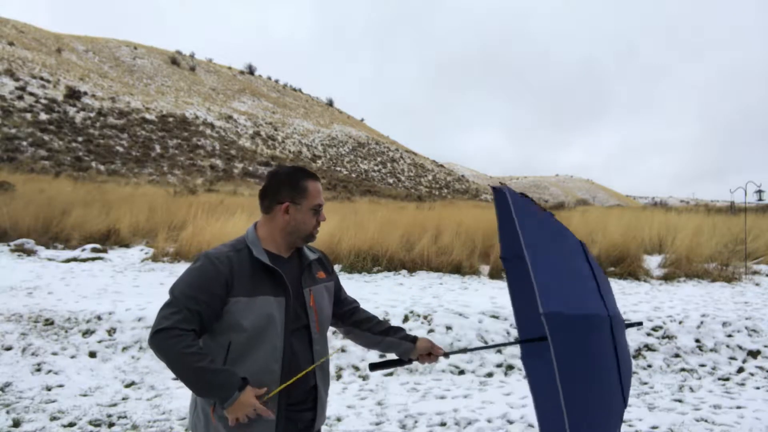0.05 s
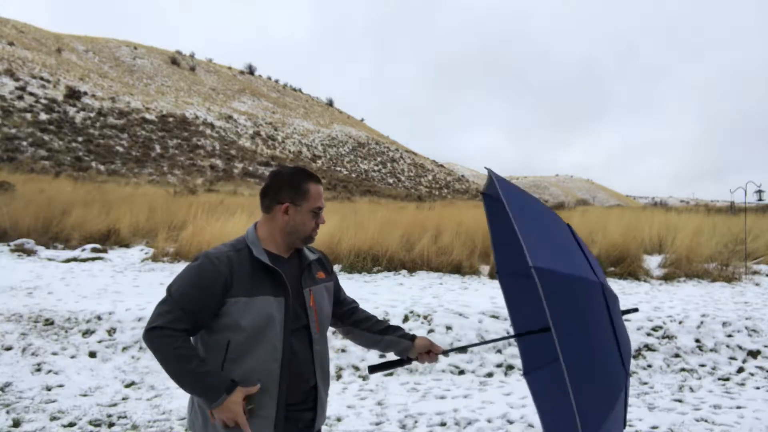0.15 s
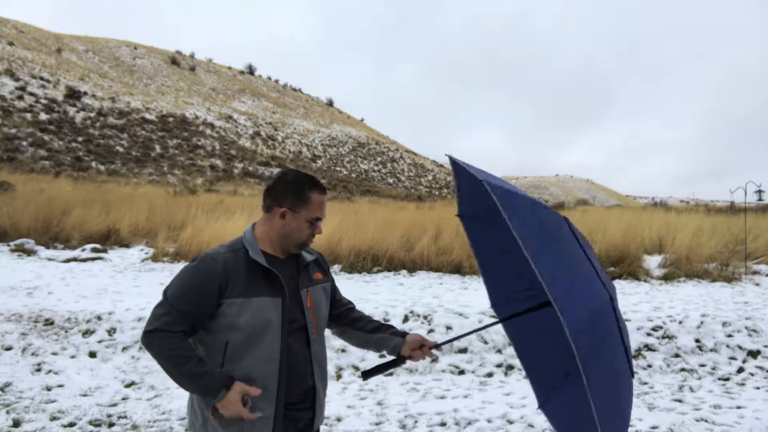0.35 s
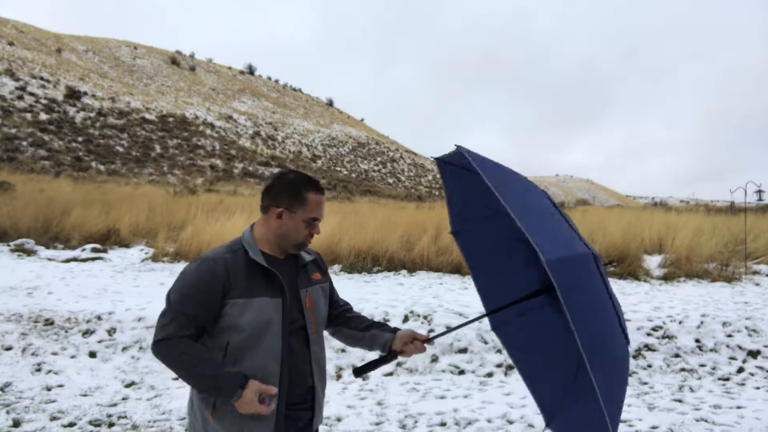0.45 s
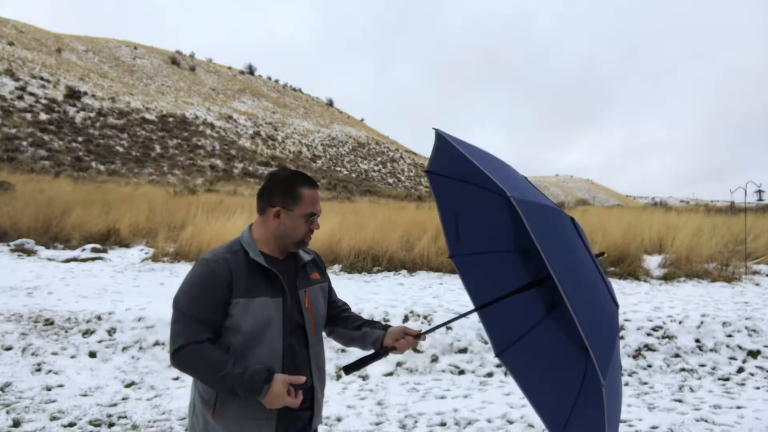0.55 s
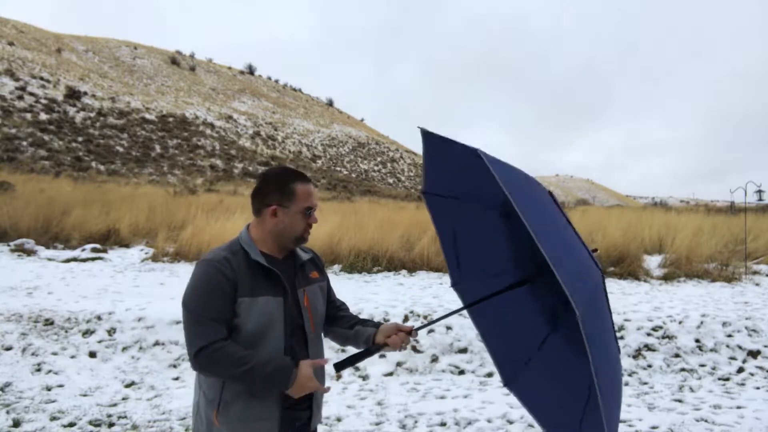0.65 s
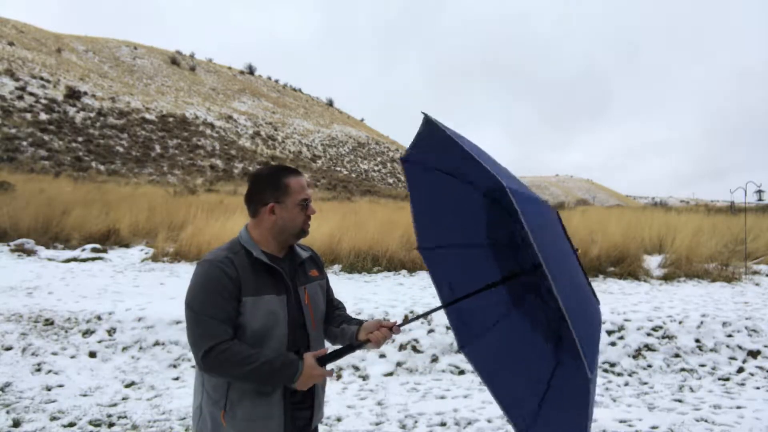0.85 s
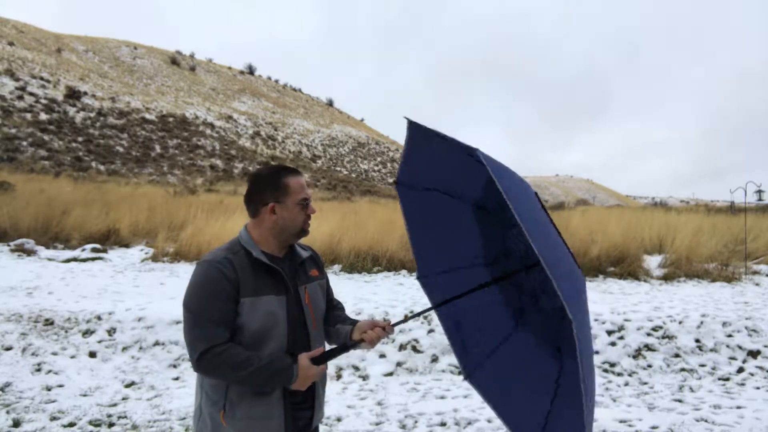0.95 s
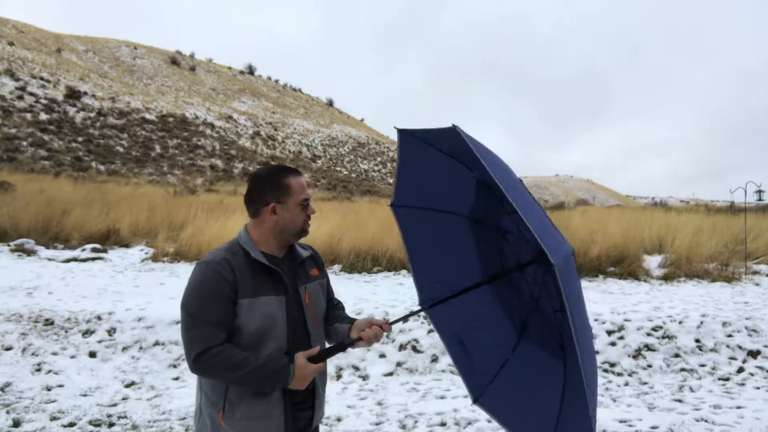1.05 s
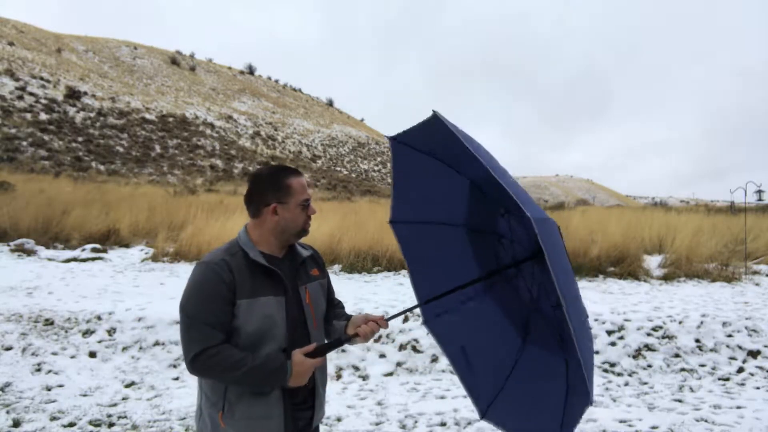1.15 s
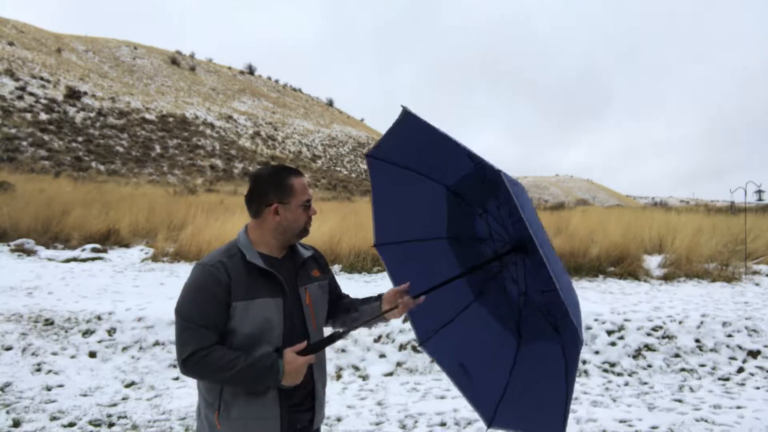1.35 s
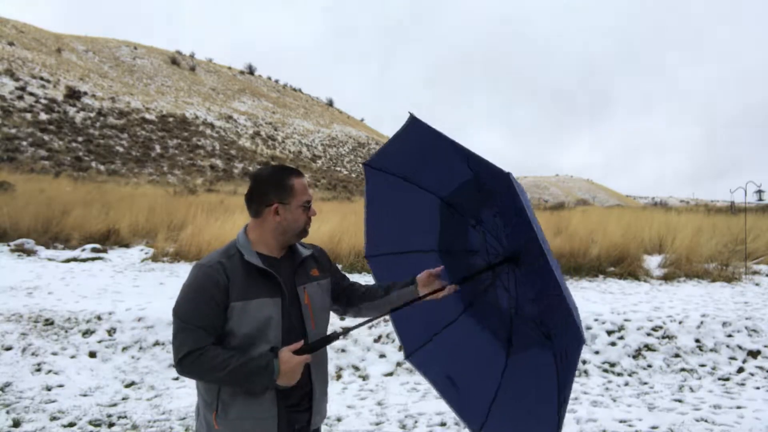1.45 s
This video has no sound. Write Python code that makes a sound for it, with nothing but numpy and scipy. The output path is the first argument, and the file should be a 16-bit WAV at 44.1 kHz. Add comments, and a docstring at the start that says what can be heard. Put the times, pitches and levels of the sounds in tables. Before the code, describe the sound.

An umbrella opens with a short cloth rustle and one sharp locking snap.

```python
"""Opening an umbrella outdoors

The canopy rustles taut as the runner slides up, the steel catch clicks and the runner snaps home,
exciting the modes of frame and cloth. The ribs rattle briefly; then come a soft bump, the friction
of a sleeve and a hand closing on the handle, over faint open air."""
import sys
import numpy as np
from scipy import signal
from scipy.fft import rfft, irfft
from scipy.io import wavfile
from scipy.ndimage import uniform_filter1d

SR = 44100
rng = np.random.default_rng(int(sys.argv[2]) if len(sys.argv) > 2 else 0)


def master(y):
    """Save y as 16-bit WAV."""
    cut = np.clip(np.atleast_2d(y).T, -1, 1)
    pcm = np.round(cut * 32767)  # scale
    wavfile.write(sys.argv[1], SR, pcm.astype(np.int16))


N = 66150
T = np.arange(N) / SR


def amp(db):
    """Decibels to amplitude."""
    return 10 ** (np.asarray(db) / 20)


def unit(x):
    """Normalisation to rms 1."""
    return x / np.sqrt(np.mean(x ** 2) + 1e-20)


def colour(x, spectrum):
    """Spectral shaping, at rms 1."""
    hz, db = np.transpose(spectrum)
    bins_hz = np.fft.rfftfreq(N, 1 / SR)
    gain = amp(np.interp(np.log(bins_hz + 1), np.log(hz + 1), db))
    return unit(irfft(rfft(x) * gain, N))


def noise(spectrum):
    """Filtered Gaussian noise."""
    return colour(rng.standard_normal(N), spectrum)


def level(curve):
    """An envelope interpolated in decibels."""
    return amp(np.interp(T, *np.transpose(curve)))


def strike(start, rise, t60):
    """Linear attack and exponential decay."""
    age = np.maximum(T - start, 0)
    return np.minimum(age / rise, 1) * np.exp(-np.log(1000) * age / t60)


def ring(start, modes, rise):
    """Free vibration as a sum of damped modes."""
    return sum(amp(db) * strike(start, rise, t60) * np.sin(2 * np.pi * hz * (T - start))
               for hz, db, t60 in modes)


def swell(start, length, db):
    """A half-sine envelope."""
    return amp(db) * np.sin(np.pi * np.clip((T - start) / length, 0, 1))


def strokes(rows, spectrum):
    """Noise modulated by one swell per row."""
    return noise(spectrum) * sum(swell(*row) for row in rows)


def friction_tone(start, length, db, hz, sag_hz_per_s, jitter):
    """A wavering friction tone whose pitch falls as sliding slows."""
    waver = unit(uniform_filter1d(rng.standard_normal(N), size=90))
    pitch = (hz - sag_hz_per_s * np.clip(T - start, 0, length)) * (1 + jitter * waver)
    return swell(start, length, db) * unit(np.sin(2 * np.pi * np.cumsum(pitch) / SR))


# Spectra of air and buffets. Each row: frequency in Hz, relative level in dB.
AIR_SPECTRUM = [(15, -30), (45, -1), (90, -2.5), (230, -5), (350, -9), (1200, -13), (15500, -31)]
BUFFET_SPECTRUM = [(25, -22), (80, 1.5), (130, -5.5), (1000, -72)]
# Each row: start in seconds, length in seconds, level in dB.
AIR_BUFFETS = [(.432, .032, -58), (.603, .05, -61)]


def open_air():
    """Moving air makes faint broadband noise with soft low buffets."""
    return amp(-67) * noise(AIR_SPECTRUM) + strokes(AIR_BUFFETS, BUFFET_SPECTRUM)


# Spectra of the cloth's motions. Each row: frequency in Hz, relative level in dB.
CREASE_SPECTRUM = [(150, -20), (450, -7.5), (800, -9.5), (1250, 0), (2800, -6), (3400, -1.5), (5000, -6),
                   (6500, -1.5), (7600, -8), (10300, -14), (11500, -10), (15500, -14)]
FLAP_SPECTRUM = [(120, -22), (350, -2), (560, 0), (800, -9), (1250, -2.5), (3500, -12), (8000, -30.5)]
DRAG_SPECTRUM = [(800, -39), (2200, -18), (3200, 1), (4500, -6.5), (6300, -7), (9000, -19), (16000, -27)]
# Each row: time in seconds, level in dB.
RUSTLE_ENVELOPE = [(0, -50.5), (.035, -50.5), (.056, -53), (.07, -49.5), (.095, -45), (.113, -45.5),
                   (.137, -47.5), (.16, -41.5), (.198, -47), (.222, -40.5), (.26, -43), (.29, -58.5),
                   (.45, -75.5)]
# Each row: start in seconds, length in seconds, level in dB.
PANEL_FLAPS = [(0, .02, -44.5), (.075, .027, -46.5), (.143, .012, -43), (0.25, 0.023, -43)]
CLOTH_DRAGS = [(.047, 0.018, -47.5), (.086, 0.016, -44.5), (.15, 0.019, -41.5)]


def canopy_rustle(creases_per_s=2500, spread_db=2.5, crease_share=0.37):
    """Tension releases creases as random impulses, while panels flap out and drag over the ribs."""
    sizes = amp(spread_db * np.minimum(rng.exponential(1, N), 4))
    creases = unit(sizes * rng.choice([-1, 1], N) * (rng.random(N) < creases_per_s / SR))
    crackle = np.sqrt(crease_share) * creases + np.sqrt(1 - crease_share) * rng.standard_normal(N)
    rustle = colour(crackle, CREASE_SPECTRUM) * level(RUSTLE_ENVELOPE)
    return rustle + strokes(PANEL_FLAPS, FLAP_SPECTRUM) + strokes(CLOTH_DRAGS, DRAG_SPECTRUM)


# Each row: frequency in Hz, relative level in dB.
GLIDE_SPECTRUM = [(6000, -25), (8000, -2.5), (10200, -6), (11700, 0), (15500, 0)]
# Each row: time in seconds, level in dB.
GLIDE_ENVELOPE = [(0, -51), (.07, -59), (.23, -59.5), (.26, -91)]
# Each row: start in seconds, length in seconds, level in dB, pitch in Hz.
RUNNER_SQUEAKS = [(.208, .014, -38.5, 1710), (.22, .014, -42.5, 1690)]


def runner_glide():
    """Sliding friction on the shaft hisses, then squeaks just before the runner locks."""
    squeaks = sum(friction_tone(*row, sag_hz_per_s=1500, jitter=0.015) for row in RUNNER_SQUEAKS)
    return squeaks + noise(GLIDE_SPECTRUM) * level(GLIDE_ENVELOPE)


# Spectra of the jacket's friction. Each row: frequency in Hz, relative level in dB.
SLEEVE_SPECTRUM = [(60, -19.5), (150, -7), (1050, -4), (4200, -10.5), (15500, -21.5)]
CUFF_SPECTRUM = [(200, -24), (1100, -9), (1600, 6), (2000, -3), (9000, -32)]
# Each row: time in seconds, level in dB.
SLEEVE_ENVELOPE = [(.3, -64.5), (.44, -58.5), (.58, -60.5), (.65, -60.5), (.73, -63), (.79, -77.5),
                   (.96, -72), (1.01, -63.5), (1.04, -64.5), (1.08, -80), (1.5, -69.5)]
# Each row: start in seconds, length in seconds, level in dB.
CUFF_BRUSHES = [(.615, 0.059, -59)]
# Each row: start in seconds, length in seconds, level in dB, pitch in Hz.
WEAVE_TONES = [(0.633, 0.045, -58, 1450), (.668, .046, -66, 640)]


def sleeve_rub():
    """Cloth friction makes a soft noise; the weave sings faintly as the cuff brushes the jacket."""
    weave = sum(friction_tone(*row, sag_hz_per_s=3000, jitter=0.028) for row in WEAVE_TONES)
    rub = noise(SLEEVE_SPECTRUM) * level(SLEEVE_ENVELOPE)
    return weave + rub + strokes(CUFF_BRUSHES, CUFF_SPECTRUM)


# Each row: frequency in Hz, relative level in dB, 60 dB decay time in seconds.
FRAME_MODES = [(856, -19.6, .01), (1320, -8.5, .02), (1595, -2.2, .023), (1755, -16, .024),
               (2066, -9.8, .018), (2280, -3.6, .009), (2690, -13, .013), (3010, -22, .024),
               (3560, -13.5, 0.019), (3770, -23, .033)]
CANOPY_MODES = [(262, -4.2, .022), (380, -5.6, .04), (516, 3, .019), (611, 5.6, .015)]
# Each row: start in seconds, frame gain in dB, canopy gain in dB.
FRAME_BLOWS = [(.019, -34, -64), (.2398, -19.5, -45), (.2472, -7.2, -41), (.24954, -.3, -21.7),
               (.2535, -19.3, -44), (0.2627, -19, -41), (.2735, -31, -52), (0.305, -32, -62),
               (.325, -37, -69), (.3296, -36, -75), (.347, -40, -68)]


def frame_knocks(rise_s=0.00058):
    """Impacts of the runner and rattling ribs excite the modes of the frame and taut canopy."""
    return sum(amp(frame_db) * ring(start, FRAME_MODES, rise_s)
               + amp(canopy_db) * ring(start, CANOPY_MODES, rise_s)
               for start, frame_db, canopy_db in FRAME_BLOWS)


# Each row: frequency in Hz, relative level in dB.
SHIVER_SPECTRUM = [(150, -24.5), (300, -6), (600, -6.5), (790, -16), (1200, -5), (6000, -1), (16000, -11)]


def shiver(snap, split_hz=3000, rise_s=0.00058):
    """Vibration diffuses through ribs and cloth, where damping takes the treble first."""
    diffuse = noise(SHIVER_SPECTRUM)
    low = signal.sosfilt(signal.butter(2, split_hz, fs=SR, output="sos"), diffuse)
    high = signal.sosfilt(signal.butter(2, split_hz, "high", fs=SR, output="sos"), diffuse)
    tail = low * strike(0, rise_s, t60=0.17) - high * strike(0, rise_s, t60=0.11)
    return amp(-23) * signal.fftconvolve(snap, tail / np.linalg.norm(tail))[:N]


# Each row: frequency in Hz, relative level in dB.
CATCH_MODES = [(4660, -6), (5240, -3), (5420, -4), (5800, -1.5), (6270, -.5), (6560, -3), (6900, -7),
               (9560, -7)]
CRACK_SPECTRUM = [(700, -32), (1800, -10), (3400, -5), (4300, -7), (5200, 0), (6600, .5), (7300, -12),
                  (7900, -7), (9500, -6), (10200, -12), (16000, -15)]
# Each row: start in seconds, crack and ring gains in dB, 60 dB decay in seconds, tilt in dB per octave.
CATCH_CLICKS = [(0.12, -38, -54, .035, 1.5), (.154, -39, -55, .03, -1.5), (0.2166, -29.5, -44.5, 0.026, 4),
                (.2398, -19.5, -31, .022, 2), (.2471, -7, -9, 0.0088, -0.5), (0.2494, -19, -32, 0.025, 0),
                (0.2737, -39.5, -45.5, .02, -1), (0.3041, -33, -42, .022, -2.5)]


def catch_clicks(rise_s=0.00084):
    """Hard steel contact at the catch and rib joints gives a broadband crack and a short modal ring."""
    clicks = np.zeros(N)
    for start, crack_db, ring_db, t60, tilt in CATCH_CLICKS:
        crack = noise([(hz, db + tilt * np.log2(hz)) for hz, db in CRACK_SPECTRUM])
        modes = [(hz, db, t60) for hz, db in CATCH_MODES]
        clicks += amp(crack_db) * crack * strike(start, rise_s, t60)
        clicks += amp(ring_db) * ring(start, modes, rise_s)
    return clicks


# Each row: frequency in Hz, relative level in dB.
SCRAPE_SPECTRUM = [(400, -20), (1200, -4.5), (1750, 2.5), (2500, -10), (3300, -4), (4800, -12), (5900, -7),
                   (13000, -29)]
# Each row: start in seconds, length in seconds, level in dB.
RIB_SLIDES = [(.272, .016, -50), (.291, .011, -47.5), (.305, .017, -45), (.322, .046, -54),
              (.37, .02, -55.5)]


def rib_scrape():
    """Sliding friction makes bursts of noise as the ribs settle."""
    return strokes(RIB_SLIDES, SCRAPE_SPECTRUM)


# Each row: frequency in Hz, relative level in dB.
PAT_SPECTRUM = [(30, -17), (120, -6), (300, -2), (550, 0), (850, -7), (1400, -7.5), (2400, -15),
                (15000, -31)]
# Each row: start in seconds, level in dB, 60 dB decay time in seconds, thud level in dB.
HAND_PATS = [(.427, -40, .039, -54), (.764, -55, .029, -76), (.981, -47.5, .028, -64)]
# Each row: frequency in Hz, relative level in dB, 60 dB decay time in seconds.
HANDLE_MODES = [(323, -6, .04), (524, -1, .026), (835, 1, .04), (1290, 1, 0.047), (1560, -2.5, .028),
                (2740, -4, .02), (3530, -4, .025)]
PALM_MODES = [(286, -12, 0.033), (490, 1, 0.016), (770, -7, 0.011)]
# Each row: start in seconds, handle gain in dB, palm gain in dB.
HAND_GRIPS = [(.978, -52.5, -62.5), (0.9815, -50.5, -49.5), (0.9976, -63, -50)]


def hand_contacts(rise_s=0.00081, thud_hz=73, thud_t60_s=0.13):
    """Soft impacts give dull pats and thuds; the grip excites modes of the hollow handle and the palm."""
    skin = noise(PAT_SPECTRUM)
    contacts = np.zeros(N)
    for start, db, t60, thud_db in HAND_PATS:
        contacts += amp(db) * skin * strike(start, rise_s, t60)
        contacts += ring(start, [(thud_hz, thud_db, thud_t60_s)], rise_s)
    for start, handle_db, palm_db in HAND_GRIPS:
        contacts += amp(handle_db) * ring(start, HANDLE_MODES, rise_s)
        contacts += amp(palm_db) * ring(start, PALM_MODES, rise_s)
    return contacts


# Each row: frequency in Hz, relative level in dB.
FIZZ_SPECTRUM = [(7000, -18), (10500, -12), (12500, -2), (16000, -8.5)]


def fizz():
    """High-frequency noise swells briefly near the end."""
    return noise(FIZZ_SPECTRUM) * swell(start=1.29, length=0.21, db=-67.5)


def scene():
    """The sources superpose in mono; the light canopy radiates no deep bass from the snap."""
    bass_cut = signal.butter(6, 263, "high", fs=SR, output="sos")
    snap = signal.sosfilt(bass_cut, frame_knocks() + catch_clicks())
    umbrella = canopy_rustle() + runner_glide() + snap + shiver(snap) + rib_scrape()
    return (open_air() + umbrella + sleeve_rub() + hand_contacts() + fizz())[None]


def record(dry, edge_hz=15850):
    """A linear-phase low-pass filter limits the bandwidth."""
    lowpass = signal.firwin(511, edge_hz, window=("kaiser", 9), fs=SR)
    return signal.oaconvolve(dry, lowpass[None], "same")


dry = scene()
out = record(dry)
master(out)
```